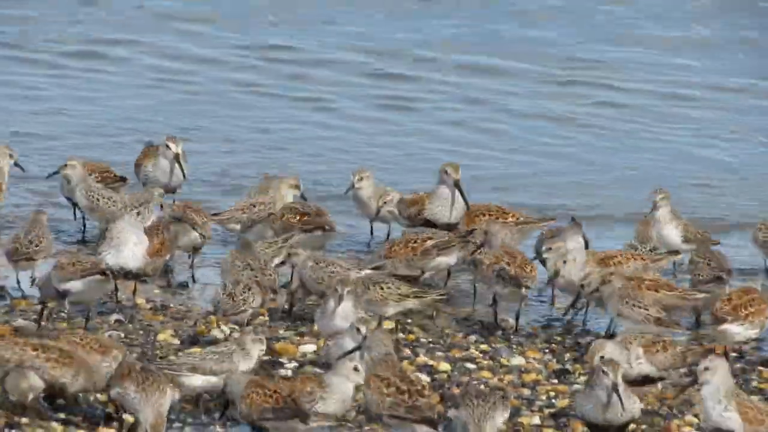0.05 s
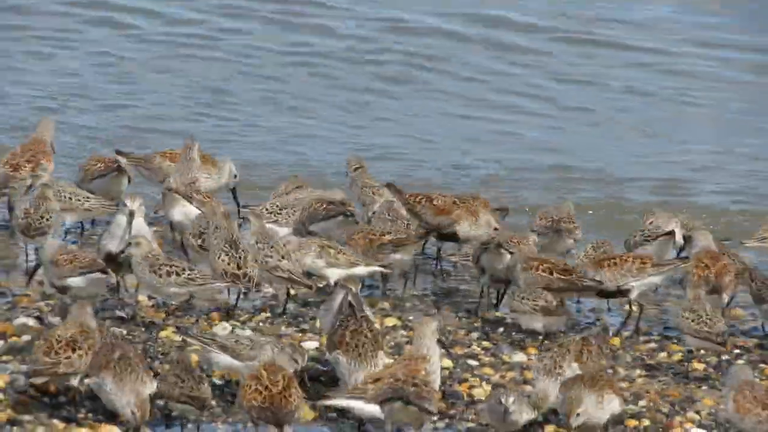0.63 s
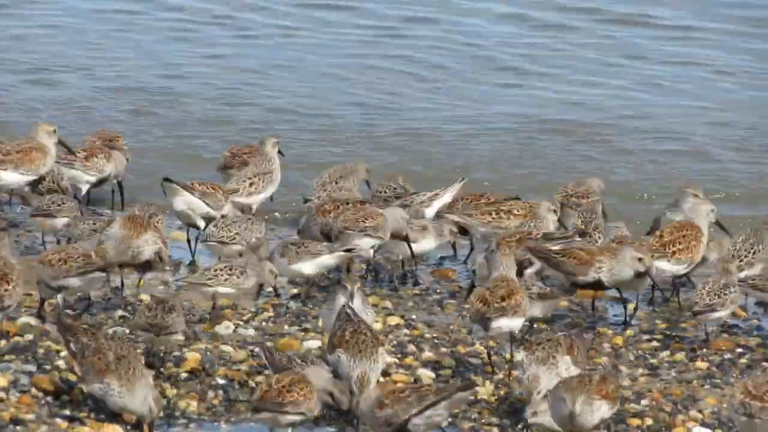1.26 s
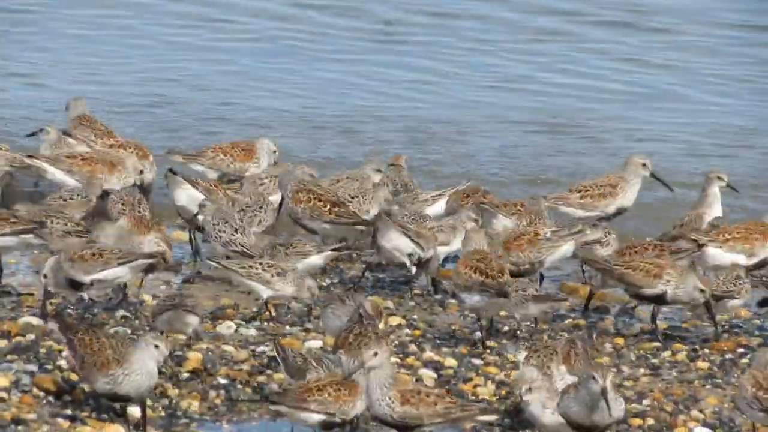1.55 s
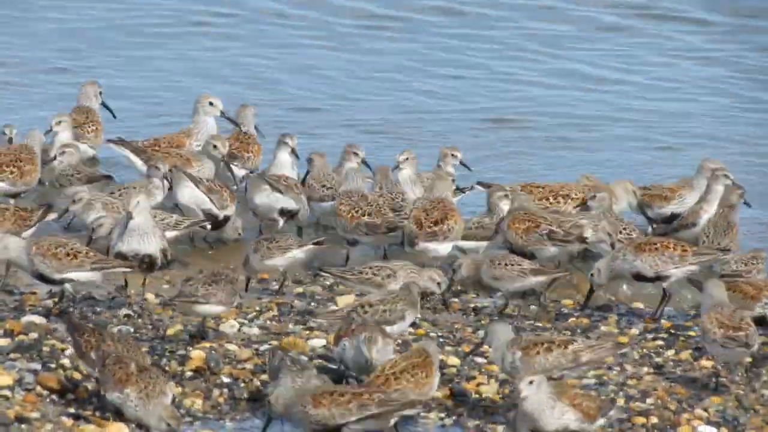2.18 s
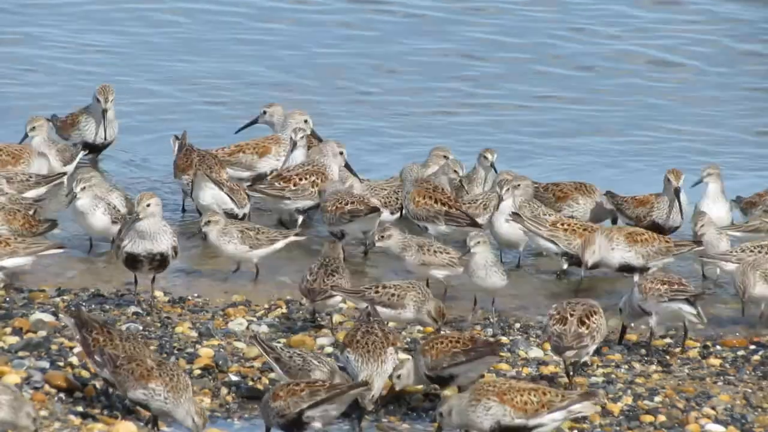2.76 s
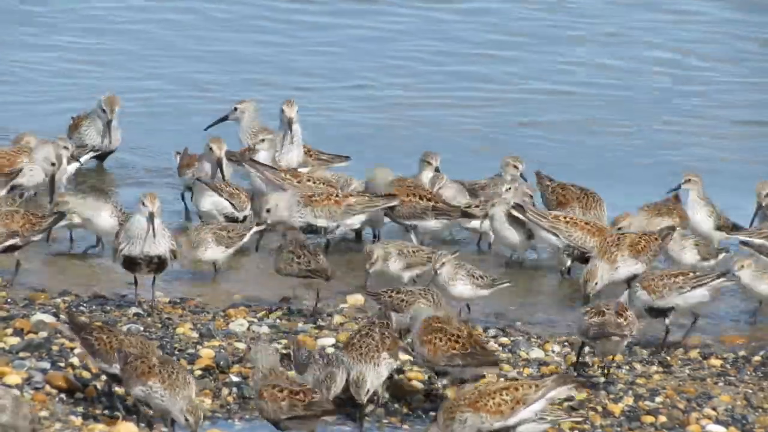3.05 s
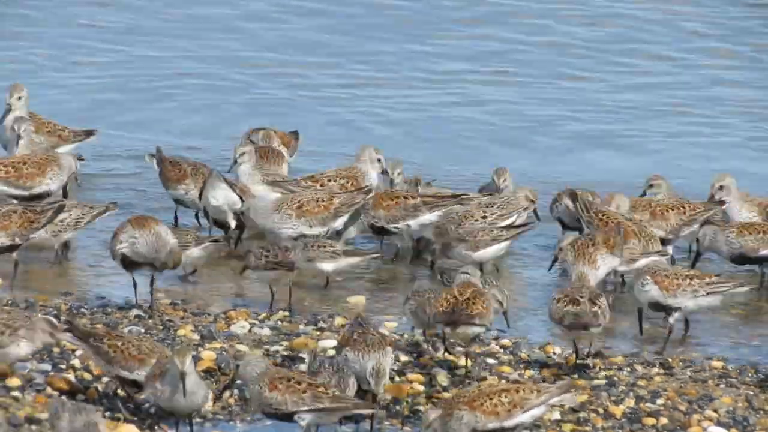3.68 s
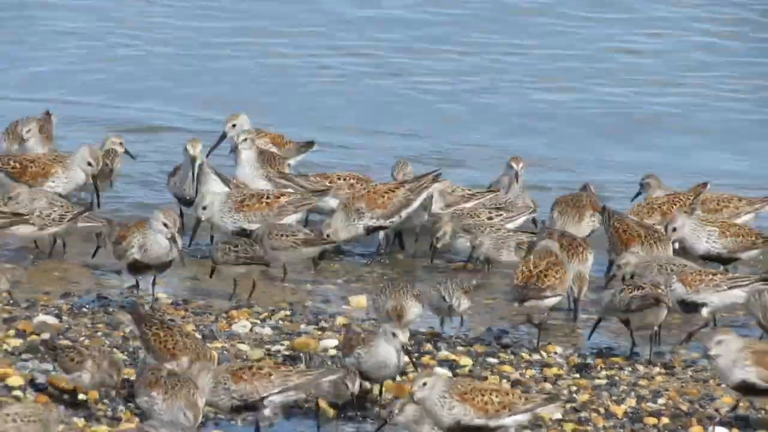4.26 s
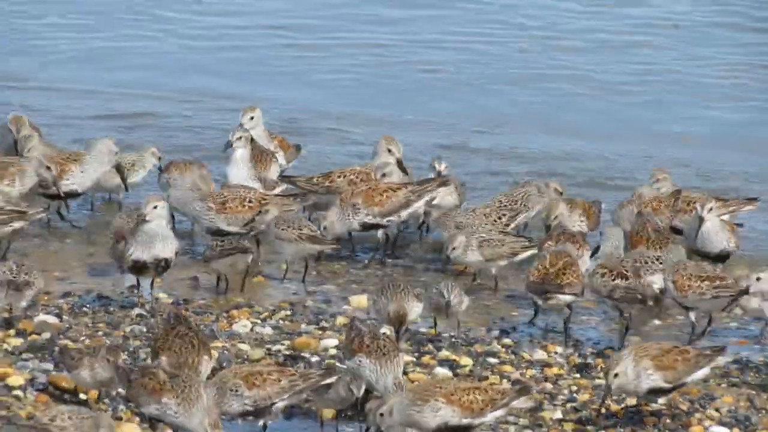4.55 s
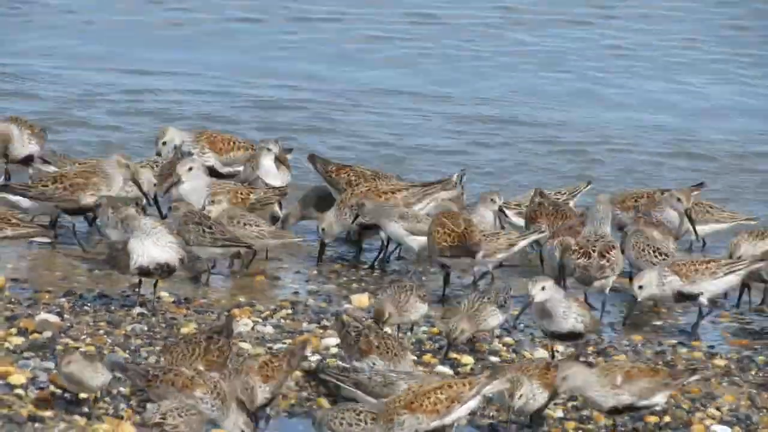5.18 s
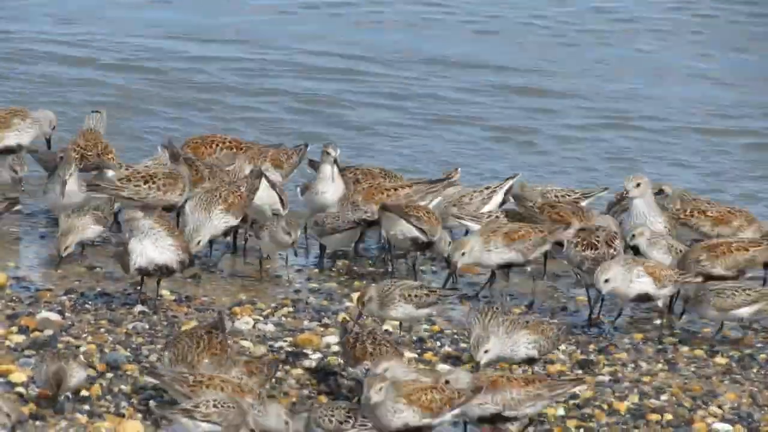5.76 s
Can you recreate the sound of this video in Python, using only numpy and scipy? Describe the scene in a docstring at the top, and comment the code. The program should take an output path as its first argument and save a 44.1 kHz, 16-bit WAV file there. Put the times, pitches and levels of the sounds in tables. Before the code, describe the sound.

Low, ragged wind thumps on the microphone over the constant trilling and peeping of shorebirds and softly fizzing ripples.

```python
"""A pebble shore opens on fizzing ripples and a big flock of sandpipers: hundreds of thin, buzzy, arched
calls merge into chatter, with a few near birds on top and brief squabbles. Low, ragged puffs of wind
buffet the microphone; around 2 s the hardest overload it and its limiter ducks the shore. The wind
eases near 3 s, then returns, with small splashes among the birds' feet just after 4 s. The squabbling
peaks past 5 s, and a last run of gusts closes the scene."""
import sys
import numpy as np
from scipy import signal
from scipy.fft import rfft, irfft, next_fast_len
from scipy.io import wavfile
from scipy.ndimage import uniform_filter1d, minimum_filter1d, map_coordinates

SR = 44100
rng = np.random.default_rng(int(sys.argv[2]) if len(sys.argv) > 2 else 0)


def wav_record(signal):
    """Record a signal, one row per channel, as 16-bit PCM in the file named by sys.argv[1]."""
    frames = np.transpose(np.atleast_2d(signal))
    bounded = np.clip(frames, -1, 1)
    # unit amplitude maps onto the largest positive 16-bit level
    quanta = np.round(bounded * 32767).astype(np.int16)
    wavfile.write(sys.argv[1], SR, quanta)


N = 265923

# Levels in the tables are fader settings, ahead of each layer's trim and pan.
# Level rides for the shore: time_s, flock_db, water_db
SHORE_LEVELS = [(0, -61.5, -76), (0.35, -60, -77.5), (0.75, -58, -73.5), (1.3, -57, -72),
                (1.75, -57, -72.5), (2.2, -55.5, -74), (2.9, -57, -73.5), (3.25, -56, -73),
                (3.95, -54, -73.5), (4.17, -51.5, -69), (4.5, -54, -72.5), (5.05, -52.5, -70),
                (5.3, -50, -68), (5.65, -54.5, -71), (6.03, -52.5, -73.5)]
# How alike left and right are in the diffuse beds: frequency_hz, correlation
STEREO_LIKENESS = [(100, 0.21), (1400, 0.54), (3000, 0.54), (7000, 0.27), (15000, .15)]

# Tone curves for the noise layers: frequency_hz, relative_db
WATER_EQ = [(60, 19), (300, 8), (750, 12), (1300, 6.5), (2200, 13), (4000, 9), (6000, -1), (8500, -5),
            (11000, -10), (15500, -14)]
SPRAY_EQ = [(1000, -5), (2800, -1), (3500, 0), (5500, -7.5), (9000, -9.5), (12000, -22), (16000, -28)]
RUMBLE_EQ = [(10, -1), (25, -9.5), (55, 2.5), (120, 1.5), (200, -6), (320, -27), (600, -56.5), (1500, -79),
             (4000, -120)]
FLUTTER_EQ = [(80, -14.5), (200, 9.5), (320, 7.5), (500, -5), (850, -19.5), (1400, -37.5), (2500, -61.5),
              (6000, -76)]
CRACKLE_EQ = [(400, -22.5), (800, 11), (1300, 3.5), (1800, -11.5), (2600, -16.5), (5000, -38.5),
              (12000, -58)]
FAR_FLOCK_EQ = [(700, -28.5), (1200, 1.5), (1550, 3.5), (1850, -0.1), (2250, 7), (2650, 6.5), (3050, 0),
                (3600, -7.5), (4600, -35.5), (7000, -35.5), (14000, -64)]

# Small spits of spray: time_s, level_db
SPLASHES = [(0.395, -52.5), (0.6194, -55), (1.2234, -55), (2.315, -47), (2.565, -49), (2.6177, -51),
            (2.718, -38), (2.723, -59), (2.731, -48), (2.9004, -59), (3.02, -49), (3.362, -53),
            (4.083, -49), (4.179, -43), (4.1875, -37), (4.1943, -40), (4.214, -44.5), (4.6437, -52),
            (5.267, -47)]
# Water drops that ring unsteadily: start_s, pitch_hz, level_db
DROPS = [(1.207, 1065, -42), (2.718, 3390, -44), (2.832, 8940, -64.5), (2.96, 1555, -52),
         (4.492, 1875, -49.5), (4.893, 9900, -63)]

# The breeze under the gusts: time_s, rumble_db
BREEZE = [(0, -40.5), (0.8, -44), (1.15, -56), (1.4, -33), (2.65, -36), (3.25, -47), (3.9, -43), (4.6, -40),
          (5.3, -26), (6.03, -25)]
# Gusts on the microphone: start_s, hold_s, rumble_db, flutter_over_rumble_db
GUSTS = [(0.007, 0.17, -28.5, -7.5), (0.274, 0.0098, -29.5, -21), (0.389, 0.012, -32, -46),
         (0.604, 0.1, -26, -16.5), (1.271, 0.29, -21, -15.5), (1.6, 0.09, -16, -7),
         (1.706, 0.088, -21.5, -28.5), (1.83, 0.26, -18.5, -7), (2.169, 0.3, -15.5, -5),
         (2.503, 0.21, -22.5, -13), (2.896, 0.2, -35.5, -29), (3.175, 0.026, -36, -38),
         (3.288, 0.029, -39, -31), (3.398, 0.075, -27, -23.5), (3.585, 0.13, -18.5, -13),
         (3.841, 0.15, -24.5, -23.5), (4.076, 0.079, -16, -16), (4.245, 0.12, -21.5, -17),
         (4.428, 0.015, -13, -12.5), (4.706, 0.083, -22, -17), (4.824, 0.02, -31, -43),
         (4.944, 0.0055, -22.5, -43), (5.046, 0.038, -19, -20), (5.161, 0.13, -14, -17),
         (5.328, 0.24, -19, -28), (5.56, 0.25, -20, -15.5), (5.784, 0.31, -14, -3)]
# Thumps of the hardest eddies: time_s, peak_db, rolloff_hz
HARD_EDDIES = [(0.084, -15.5, 215), (0.178, -10, 163), (0.398, -26.5, 117), (0.617, -15.5, 130),
               (1.283, -6, 280), (1.291, -9.5, 290), (1.356, -10.5, 101), (1.461, -7, 255),
               (1.607, -4, 177), (1.659, -7.5, 131), (1.682, -5.5, 214), (1.792, -5.5, 263),
               (1.801, 3, 287), (1.806, -2.5, 333), (1.907, -5, 596), (1.919, -3, 550), (2.051, -8, 453),
               (2.066, 7.5, 165), (2.139, -2.5, 190), (2.19, -1.5, 277), (2.205, -3, 303),
               (2.233, -2.5, 402), (2.285, -0.5, 190), (2.344, 1.5, 173), (2.4, -2.5, 121),
               (2.433, -0.5, 204), (2.57, -10.5, 150), (2.603, -14, 189), (2.667, -9, 189),
               (3.015, -21.5, 83.6), (3.599, -9, 142), (3.847, -8.5, 233), (4.101, -6.5, 112),
               (4.15, -11, 247), (4.226, -0.5, 85), (4.237, -10, 250), (4.309, -7.5, 95), (4.429, -6, 345),
               (5.061, -6, 102), (5.27, -7, 170), (5.445, -8.5, 330), (5.45, -1.5, 66), (5.524, -20.5, 282),
               (5.584, -8.5, 227), (5.665, -2.5, 127), (5.836, -5.5, 254), (5.873, 1.5, 134),
               (5.923, -0.5, 220), (6.008, -3.5, 191)]
# Sharp snaps of air on the microphone port: time_s, level_db
AIR_SNAPS = [(1.8, -21.5), (1.805, -26), (1.906, -17), (1.917, -24), (2.051, -22), (2.067, -10.5),
             (2.191, -27), (2.271, -25), (2.43, -21.5), (2.463, -33), (3.846, -43), (5.441, -39),
             (5.587, -37), (5.875, -15.5), (5.922, -34), (5.931, -40), (6.003, -14)]
# Sharp clicks of the recorder overloading under the hardest gusts: time_s, peak_db
OVERLOAD_TICKS = [(1.799, -26), (2.068, -32), (5.445, -24.5), (5.91, -38)]
# Spans when the air hits the right port instead of the left: start_s, end_s
RIGHT_PORT_SPANS = [(0.345, 0.41), (0.55, 0.83), (2.99, 3.05), (3.15, 3.28)]

# Call shapes, pitch moves in natural-log units: pitch_scatter, length_s, arch, glide_scatter, droop
TRILL_SHAPE = (.08, .05, .05, .07, .035)
CHURR_SHAPE = (.22, .04, .04, .06, .01)
PEEP_SHAPE = (.16, .025, .03, .06, .02)
# Breaths in the trilling: centre_s, length_s
LULLS = [(0.965, 0.034), (1.965, 0.084), (2.145, 0.051), (2.945, 0.083), (3.872, 0.058), (4.3, 0.056),
         (5.967, 0.083)]
# Several birds trilling at once: start_s, span_s, pitch_hz, level_db
SQUABBLES = [(0.223, 0.12, 2795, -61), (0.852, 0.099, 3010, -56), (1.687, 0.1, 2750, -53.5),
             (4.146, 0.087, 2636, -54), (5.096, 0.097, 2750, -56), (5.247, 0.11, 2756, -49),
             (5.365, 0.085, 2555, -49.5), (5.761, 0.13, 2720, -53)]
# Foreground calls; bow lifts the middle pitch, rasp runs from pure at 0 to hoarse at 1.5 and up:
# start_s, length_s, start_hz, end_hz, bow_share, level_db, rasp
NEAR_CALLS = [(0.488, 0.095, 3130, 3220, 0.021, -59, 0.73), (0.556, 0.085, 3330, 3210, 0.054, -57.5, 1.2),
              (0.575, 0.05, 5250, 5000, 0.01, -72, 0.8), (0.616, 0.053, 2950, 2470, -0.013, -58, .7),
              (0.986, 0.069, 3600, 2800, -0.013, -63, 1.5), (1.092, 0.04, 3400, 3720, -0.0074, -58.5, 0.83),
              (1.132, 0.065, 3280, 2860, 0.014, -59.5, 0.86), (1.212, 0.022, 4250, 4700, -0.014, -58, 0.7),
              (1.245, 0.058, 3150, 2820, 0.038, -55.5, 0.8), (1.308, 0.047, 3120, 2780, 0.014, -56, 0.93),
              (1.556, 0.057, 2600, 2420, 0.15, -55.5, 0.44), (1.735, 0.057, 2550, 3010, 0.04, -64, 1.1),
              (2.008, 0.054, 2600, 2940, -0.027, -55, 0.71), (2.395, 0.075, 6150, 6300, 0.025, -74, 0.4),
              (2.44, 0.06, 3140, 2870, 0.016, -55.5, 0.45), (2.609, 0.039, 2960, 2830, -0.004, -51, 0.62),
              (2.837, 0.062, 3340, 2680, -0.049, -58.5, 1.1), (3.03, 0.037, 3490, 3850, 0.02, -67, 1.1),
              (3.12, 0.041, 3380, 4000, 0.038, -67, 1.2), (3.204, 0.036, 4580, 4050, -0.036, -69, 0.8),
              (3.321, 0.051, 3600, 4050, -0.025, -63, 1.1), (3.506, 0.026, 3510, 3310, -0.024, -55.5, 1.1),
              (3.564, 0.052, 4700, 3920, -0.034, -64, .6), (3.6, 0.087, 2900, 2650, 0.048, -59, 0.55),
              (3.652, 0.025, 3240, 3590, -0.017, -59, 1.9), (3.734, 0.09, 2550, 2804, 0.062, -59, 0.46),
              (3.775, 0.05, 3850, 3350, -0.042, -63, .9), (3.997, 0.023, 4370, 4350, 0.0023, -61, 1.1),
              (3.998, 0.032, 2650, 2970, 0.0017, -57, .7), (4.102, 0.035, 3070, 3800, -0.032, -59, 1.5),
              (4.151, 0.072, 2760, 2854, -0.04, -55, 0.8), (4.242, 0.034, 3200, 3680, -0.049, -63, 1.2),
              (4.649, 0.044, 3340, 3860, -0.0034, -62, 1.8), (4.708, 0.053, 3810, 3520, 0.017, -57, 0.49),
              (4.85, 0.032, 3800, 3100, -0.034, -56, .7), (4.935, 0.055, 3500, 4030, .02, -63, 1.5),
              (5.071, 0.085, 2850, 3260, 0.034, -54, 1.8), (5.11, 0.025, 4480, 4800, 0, -60.5, 1.5),
              (5.19, 0.07, 3700, 3240, 0.028, -58, 1.4), (5.236, 0.051, 4000, 4600, .01, -62, 1.5),
              (5.344, 0.053, 3990, 3400, 0.03, -60, 1), (5.442, 0.11, 2830, 2960, 0.15, -56.5, 0.66),
              (5.585, 0.04, 3450, 3730, .03, -61, 1.2), (5.683, 0.071, 2870, 3500, 0, -52.5, .55),
              (5.82, 0.098, 2750, 2800, 0.035, -56, .8)]


def amp(db):
    """Decibels to gain."""
    return 10 ** (np.asarray(db) / 20)


def unit(x):
    """Scale to rms 1."""
    return x / np.sqrt(np.mean(x ** 2) + 1e-20)


def along(points, hz):
    """Read (frequency_hz, value) points on a log frequency axis."""
    knots_hz, values = np.transpose(points)
    return np.interp(np.log(hz + 1), np.log(knots_hz + 1), values)


def curves(rows):
    """One automation curve for each column after the time."""
    times, *columns = np.transpose(rows)
    return [np.interp(np.arange(N) / SR, times, column) for column in columns]


def wobble(knots_per_s):
    """A smooth random modulator."""
    return map_coordinates(rng.standard_normal(N // 8), [np.arange(N) * knots_per_s / SR], mode="wrap")


def filtered(x, response):
    """Apply a gain that is a function of frequency."""
    size = next_fast_len(N + SR // 4)
    return irfft(rfft(x, size) * response(np.fft.rfftfreq(size, 1 / SR)), size)[..., :N]


def coloured(x, eq):
    """Shape with a tone curve, at rms 1."""
    return unit(filtered(x, lambda hz: amp(along(eq, hz))))


def spread(pair):
    """Two unrelated signals become a wide stereo bed."""
    def mid_side_gains(hz):
        angle = np.arccos(along(STEREO_LIKENESS, hz)) / 2
        return np.array([np.cos(angle), np.sin(angle)])
    mid, side = filtered(pair, mid_side_gains)
    return unit(np.array([mid + side, mid - side]))


def pan(db):
    """Left and right gains for a left-minus-right level."""
    return amp([[db / 2], [-db / 2]])


def add(track, s, sound):
    """Mix a sound into a track at time s."""
    start = int(np.clip(round(s * SR), 0, N))
    track[..., start:start + sound.shape[-1]] += sound[..., :N - start]


def bursts(cues, rise_s, fall_s):
    """An envelope of short swells, one for each (time_s, level_db) cue."""
    power, t = np.zeros(N), np.arange(SR // 8) / SR
    shape = np.where(t < rise_s, np.sin(np.pi / 2 * t / rise_s) ** 2, np.exp((rise_s - t) / fall_s))
    for s, db in cues:
        add(power, s - rise_s / 2, (amp(db) * shape) ** 2)
    return np.sqrt(power)


def air_bed(rumble_db):
    """A faint, low rush of moving air, unrelated on the two sides, that swells with the gusts."""
    rush = coloured(rng.standard_normal((2, N)), RUMBLE_EQ)
    return (amp(-63) + amp(rumble_db - 20.5)) * rush * pan(-12)


def ripples():
    """Ripples wash the pebbles: a hiss sprinkled with bursting bubbles."""
    _, water_db = curves(SHORE_LEVELS)
    hiss = rng.standard_normal((2, N)) * amp(2.15 * wobble(42))
    fizz, t = np.zeros((2, N)), np.arange(SR // 100) / SR
    for when, pitch, size, side in rng.random(size=(1500, 4)):
        hz = 4000 * 3 ** pitch
        bubble = np.sin(2 * np.pi * hz * t) * np.exp(-t * hz / 16)
        add(fizz, when * N / SR, pan(14 * (side - .5)) * amp(25 * size ** 4 - 5 * pitch) * bubble)
    wash = amp(11.5) * spread(coloured(hiss, WATER_EQ))
    return amp(water_db) * (wash + amp(-9) * unit(fizz)) * pan(0.81)


def splashes():
    """Quick spits of spray and a few drops ringing with a wavering pitch."""
    spray = coloured(rng.standard_normal((2, N)), SPRAY_EQ)
    out = amp(-4.5) * bursts(SPLASHES, rise_s=0.00099, fall_s=0.0042) * spray * pan(2.7)
    t = np.arange(SR // 16) / SR
    envelope = np.exp(-t / 0.0085) * (1 - np.exp(-t / 0.00052))
    for s, hz, db in DROPS:
        phase = 2 * np.pi * np.cumsum(hz * (1 + .05 * wobble(500)[:len(t)])) / SR
        add(out, s, amp(db) * np.sin(phase) * envelope)
    return out


def gust_levels(rise_db_per_s=900, fall_db_per_s=425):
    """Rumble and flutter rides in dB: each gust rises out of the breeze, holds and dies away."""
    t = np.arange(N) / SR
    rumble_db, = curves(BREEZE)
    flutter_db = rumble_db - 39.5
    for s, hold, db, rough_db in GUSTS:
        sag_db = rise_db_per_s * np.maximum(s - t, 0) + fall_db_per_s * np.maximum(t - s - hold, 0)
        rumble_db = np.maximum(rumble_db, db - sag_db)
        flutter_db = np.maximum(flutter_db, db + rough_db - 2.27 * sag_db)  # flutter moves faster
    return rumble_db, flutter_db


def turbulence(eq, even_s):
    """Churning air: coloured noise, levelled over spans longer than even_s."""
    noise = coloured(rng.standard_normal(N), eq)
    window = np.hanning(int(even_s * SR) + 3)
    power = signal.fftconvolve(noise ** 2, window / window.sum(), "same")
    return noise / np.sqrt(np.abs(power) + 1e-6)


def eddy(rolloff_hz, rise_s, fall_s, low_cut_hz):
    """A few ragged pressure swings of peak 1; faster eddies reach higher in frequency."""
    t = np.arange(-SR // 25, SR // 25) / SR
    hz = np.fft.rfftfreq(len(t), 1 / SR)
    spectrum = np.exp(-hz / rolloff_hz) * hz ** 2 / (hz ** 2 + low_cut_hz ** 2)
    envelope = 1 / (np.exp(-t / rise_s) + np.exp(t / fall_s))
    swings = envelope * irfft(spectrum * np.exp(2j * np.pi * rng.random(len(hz))), len(t))
    return swings / np.abs(swings).max()


def small_eddies(rumble_db, flutter_db, count, octaves_per_db=.035):
    """Chance eddies as (time_s, peak_db, rolloff_hz): stronger in a gust, brighter in rough air."""
    at = ((np.arange(count) + rng.random(count)) / count * (N - 1)).astype(int)
    peak_db = rumble_db[at] + 5.5 + 5 * np.clip(rng.standard_normal(count), -2, 1.3)
    rolloff_hz = 193 * 2 ** (octaves_per_db * (flutter_db - rumble_db)[at])
    return list(zip(at / SR, peak_db, rolloff_hz))


def overload_ticks():
    """Sharp one-sample clicks, placed by cue, of the recorder overloading under the hardest gusts."""
    out = np.zeros(N)
    for s, db in OVERLOAD_TICKS:
        add(out, s, amp(db) * np.ones(1))
    return out


def port_gains(swap_s=0.0079, leak=0.48):
    """The microphone senses a pressure difference: wind on one port leaks across, weak and inverted."""
    t = np.arange(N) / SR
    on_right = sum(1.0 * ((t > start) & (t < end)) for start, end in RIGHT_PORT_SPANS)
    right = uniform_filter1d(on_right, int(swap_s * SR))
    share = np.array([1 - right, right])
    return share - leak * share[::-1]


def wind_buffets(rumble_db, flutter_db):
    """Gusts rumble, flutter and crackle on the microphone ports; single eddies thump."""
    rumble = amp(rumble_db - 1.5 + 2.66 * wobble(40)) * turbulence(RUMBLE_EQ, even_s=0.11)
    flutter = amp(flutter_db + 1.6 + 3.6 * wobble(110)) * turbulence(FLUTTER_EQ, even_s=0.016)
    snaps = amp(1) * bursts(AIR_SNAPS, rise_s=0.00073, fall_s=0.0014)
    crackle = (amp(flutter_db - 31 + 7.8 * wobble(220)) + snaps) * turbulence(CRACKLE_EQ, even_s=0.0028)
    thumps = np.zeros(N)
    for s, db, rolloff_hz in list(HARD_EDDIES) + small_eddies(rumble_db, flutter_db, count=130):
        swings = eddy(rolloff_hz, rise_s=0.0031, fall_s=0.0045, low_cut_hz=93)
        add(thumps, s - len(swings) / SR / 2 - .0012, amp(db) * swings)
    return port_gains() * (rumble + flutter + crackle + thumps + overload_ticks())


def scattered(voice, balance_db, echo_s=.035, echo_db=-8):
    """Pan one bird and add its short, diffuse echo off pebbles and other birds' bodies."""
    t = np.arange(int(echo_s * SR)) / SR
    tail = rng.standard_normal((2, len(t))) * amp(-60 * t / echo_s)
    paths = (t == 0) + amp(echo_db) * tail / np.linalg.norm(tail[0])
    return pan(balance_db) * signal.fftconvolve(voice[None], paths, axes=1)


def call(length_s, contour_hz, buzz_hz, buzz, rasp, overtone_db=-26):
    """One arched whistle; a fast, uneven trill of the syrinx shakes its pitch and strength."""
    t = np.arange(int(length_s * SR) + 2) / SR
    progress = t / t[-1]
    knots = np.linspace(0, 1, int(length_s * 600) + 2)
    jitter, shimmer = [rasp * np.interp(progress, knots, v) for v in rng.standard_normal((2, len(knots)))]
    trill = buzz * np.sin(2 * np.pi * buzz_hz * t)
    start, middle, end = contour_hz
    glide_hz = start + (end - start) * progress
    bow_hz = (2 * middle - start - end) * 2 * progress * (1 - progress)
    phase = 2 * np.pi * np.cumsum((glide_hz + bow_hz) * (1 + 0.032 * (trill + jitter))) / SR
    swell = np.abs(np.sin(np.pi * progress)) ** 0.41 * (1 + trill) * (1 + np.tanh(shimmer) / 2)
    return unit(swell * (np.sin(phase) + amp(overtone_db) * np.sin(2 * phase)))


def chorus(count, centre_hz, shape, rasp, uneven_db):
    """Many birds, each call with its own time, pitch, length, strength and direction."""
    scatter, length_s, arch, glide, droop = shape
    out = np.zeros((2, N))
    times = (np.arange(count) + rng.random(count)) / count * N / SR
    birds = np.clip(rng.standard_normal((count, 7)), -2, 2)
    for s, (pitch, stretch, slope, size, side, speed, buzz) in zip(times, birds):
        rise = glide * slope - droop
        contour = centre_hz * np.exp(scatter * pitch + np.array([-arch - rise, 0, -arch + rise]))
        buzz_hz = 105 * np.exp(.25 * speed)
        voice = call(length_s * np.exp(.4 * stretch), contour, buzz_hz, 0.11 * abs(buzz), rasp)
        db = uneven_db * size - 53 * scatter * max(pitch, 0)  # high calls are fainter
        add(out, s - length_s / 2, amp(db) * scattered(voice, 4 * side))
    return unit(out)


def flock():
    """Distant calls merge into a wash; closer trills, low churrs and short peeps blur into chatter."""
    flock_db, _ = curves(SHORE_LEVELS)
    t = np.arange(N) / SR
    lull_db = -10 * sum(np.exp(-(2 * (t - s) / length) ** 2) for s, length in LULLS)
    wash = spread(coloured(rng.standard_normal((2, N)), FAR_FLOCK_EQ))
    trills = chorus(count=460, centre_hz=2780, shape=TRILL_SHAPE, rasp=0.6, uneven_db=3)
    churrs = chorus(count=300, centre_hz=2066, shape=CHURR_SHAPE, rasp=1.38, uneven_db=0.5)
    peeps = chorus(count=280, centre_hz=3400, shape=PEEP_SHAPE, rasp=0.75, uneven_db=3)
    peep_db = -8.5 + 0.13 * (flock_db - flock_db.mean())  # peeps come forward as the flock gets excited
    voices = amp(-0.6 + lull_db) * trills + amp(-9) * churrs + amp(peep_db) * peeps
    return amp(flock_db) * (amp(0.04 + 0.18 * lull_db) * wash + voices) * pan(-2.6)


def squabbles(birds=6):
    """Neighbours burst into hoarse trills together, and the chatter surges."""
    out = np.zeros((2, N))
    for s, span_s, hz, db in SQUABBLES:
        gain = amp(db - 1.5) / np.sqrt(birds)
        for delay, pitch, slope, speed, side in rng.uniform(-0.92, 1, size=(birds, 5)):
            contour = hz * np.exp(.12 * pitch + .05 * np.array([-slope, .6, slope]))
            voice = call(.7 * span_s, contour, buzz_hz=95 * np.exp(.25 * speed), buzz=.5, rasp=1.2)
            add(out, s + .15 * span_s * (1 + delay), gain * scattered(voice, 3 * side - 2))
    return out


def near_birds():
    """Single raspy whistles and peeps from the closest birds stand out of the chatter."""
    out = np.zeros((2, N))
    quirks = rng.standard_normal((len(NEAR_CALLS), 2))
    for (s, length_s, start_hz, end_hz, bow, db, rasp), (speed, side) in zip(NEAR_CALLS, quirks):
        contour = [start_hz, (start_hz + end_hz) / 2 * (1 + bow), end_hz]
        voice = call(length_s, contour, buzz_hz=100 * np.exp(.2 * speed), buzz=.35, rasp=rasp)
        add(out, s, amp(db - 2.5) * scattered(voice, 2 * side - 1))
    return out


def limiter(x, attack_s=0.00063, hold_s=0.17, release_db_per_s=13):
    """Peaks over full scale pull the gain down fast; it holds, then creeps back."""
    over_db = 20 * np.log10(np.maximum(np.abs(x).max(axis=0), 1))
    half = int(hold_s * SR / 2)
    held_db = -minimum_filter1d(-over_db, 2 * half + 1, origin=half, mode="constant")
    recovery_db = release_db_per_s * np.arange(N) / SR
    cut_db = np.maximum.accumulate(held_db + recovery_db) - recovery_db
    pole = np.exp(-1 / (attack_s * SR))
    return x * amp(-signal.lfilter([1 - pole], [1, -pole], cut_db))


def scene():
    """Birds and water in the open air, with wind on the microphone."""
    rumble_db, flutter_db = gust_levels()
    shore = flock() + squabbles() + near_birds() + ripples() + splashes()
    return shore + wind_buffets(rumble_db, flutter_db) + air_bed(rumble_db)


def record(dry):
    """The recorder ducks under the hardest eddies, clips what slips past and cuts the very top."""
    top_hz, fade_s = 15750, .006
    clipped = np.clip(limiter(dry), -1, 1)
    high_cut = signal.ellip(10, .1, 80, top_hz, fs=SR, output="sos")
    fade = np.clip(np.minimum(np.arange(N), np.arange(N)[::-1]) / (fade_s * SR), 0, 1)
    return signal.sosfilt(high_cut, clipped) * fade


dry = scene()
out = record(dry)
wav_record(out)
```